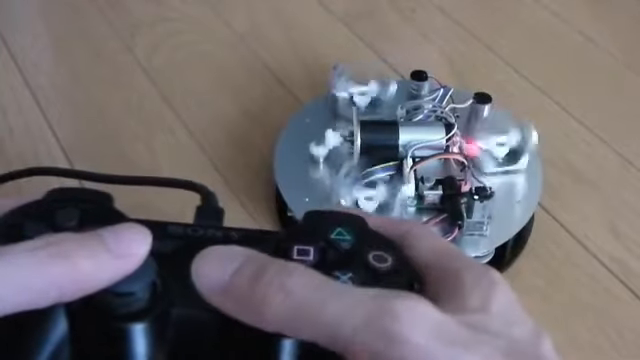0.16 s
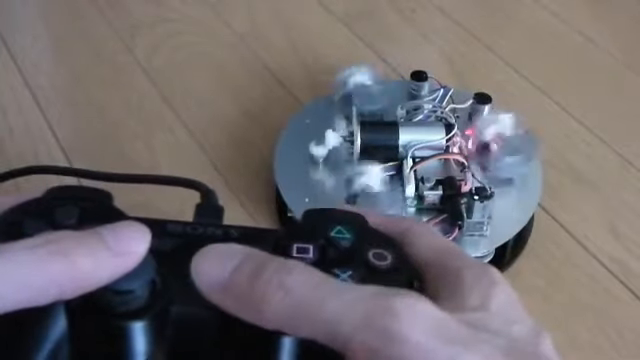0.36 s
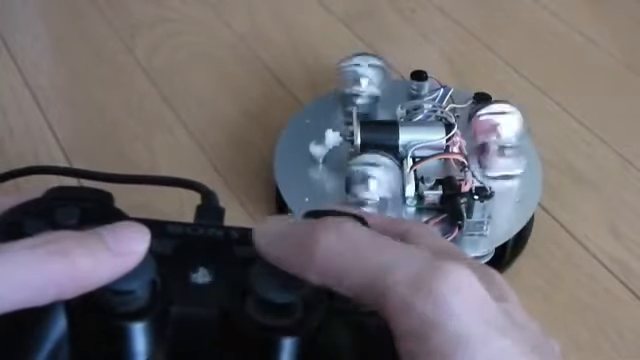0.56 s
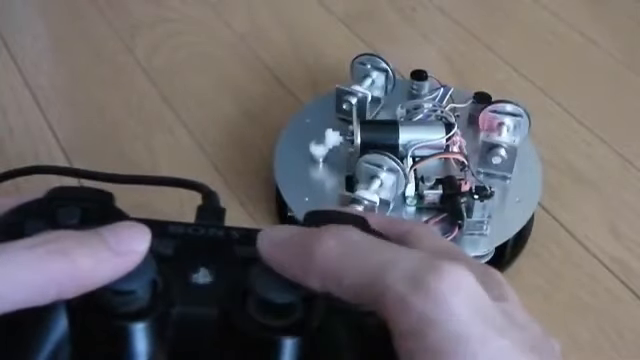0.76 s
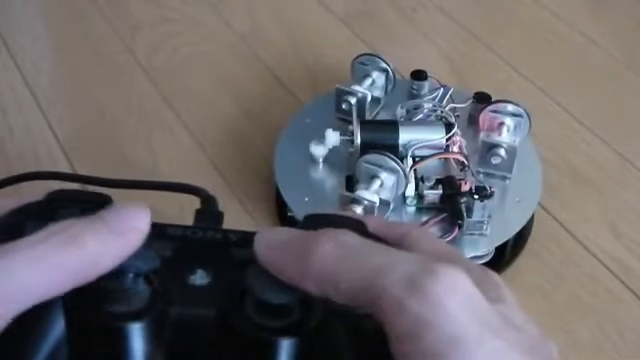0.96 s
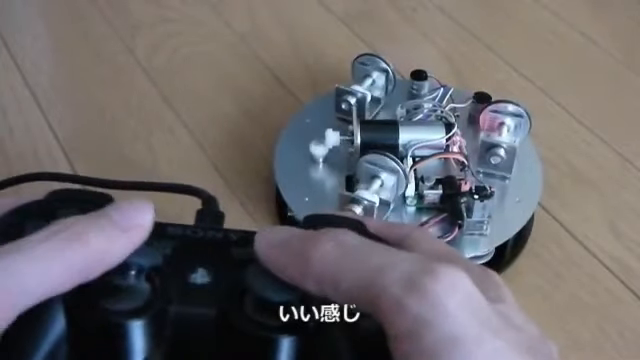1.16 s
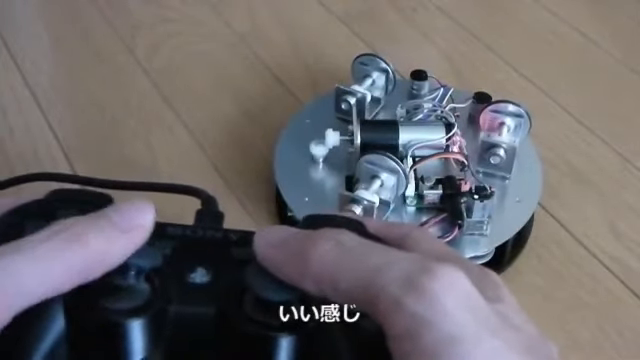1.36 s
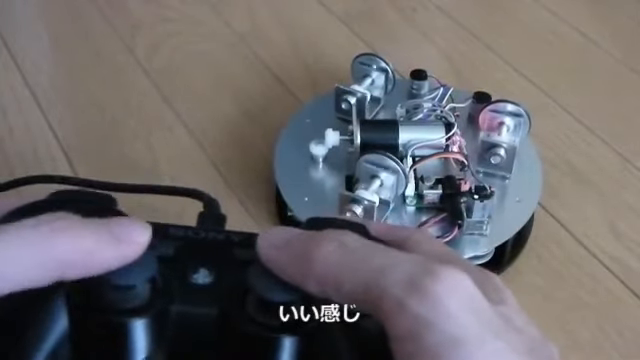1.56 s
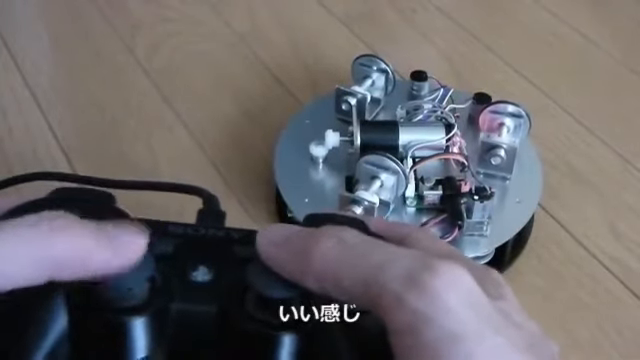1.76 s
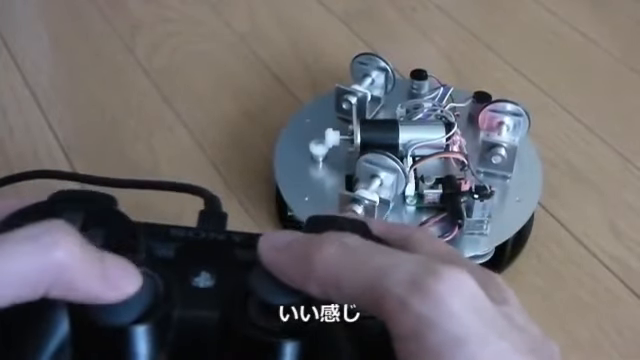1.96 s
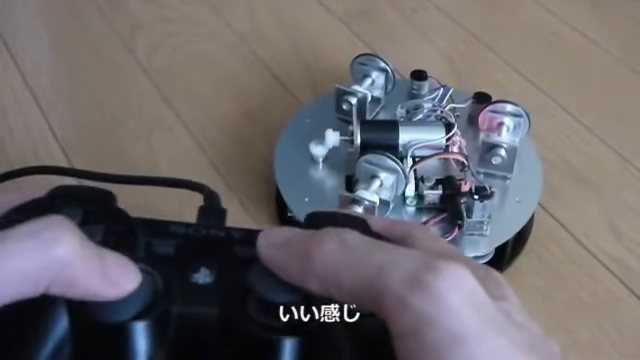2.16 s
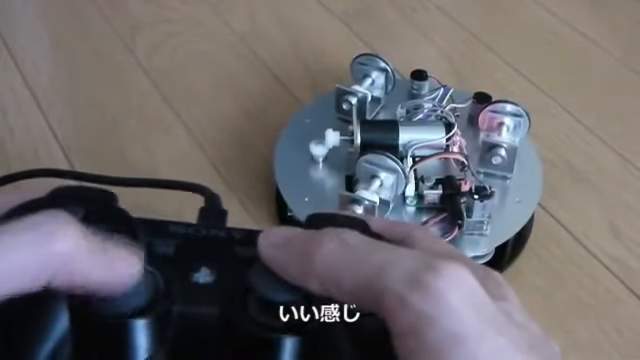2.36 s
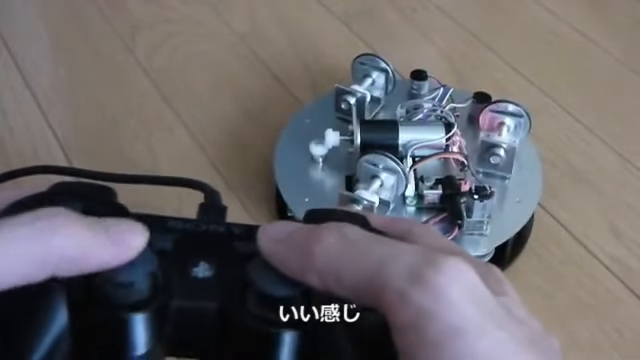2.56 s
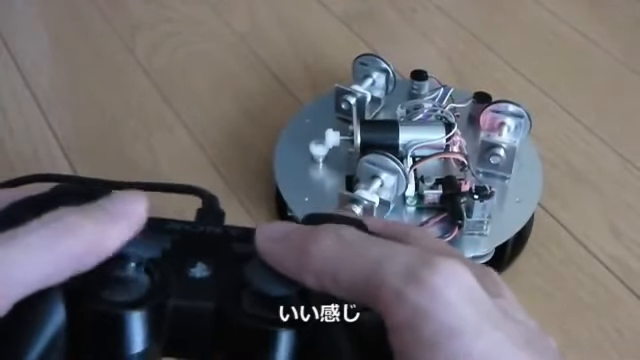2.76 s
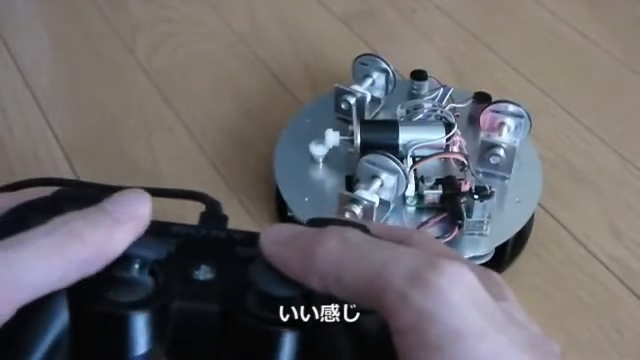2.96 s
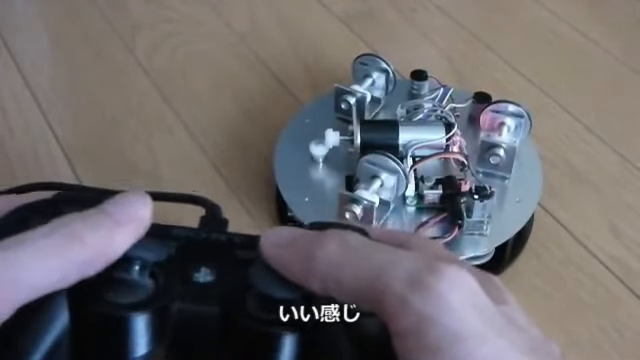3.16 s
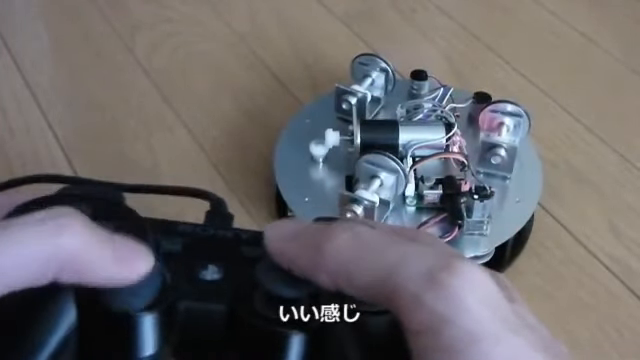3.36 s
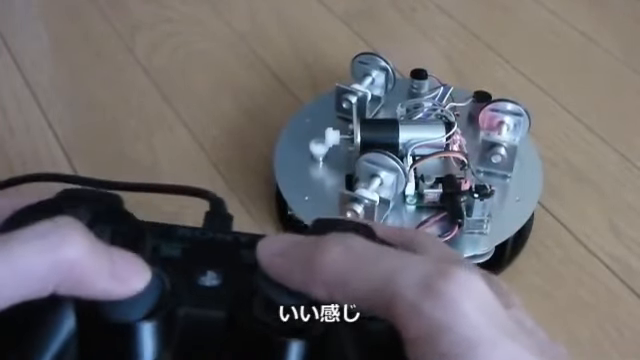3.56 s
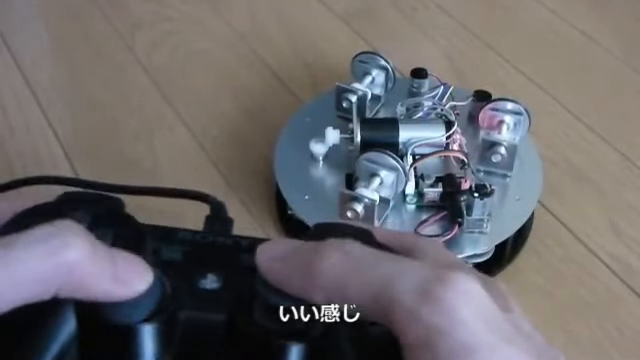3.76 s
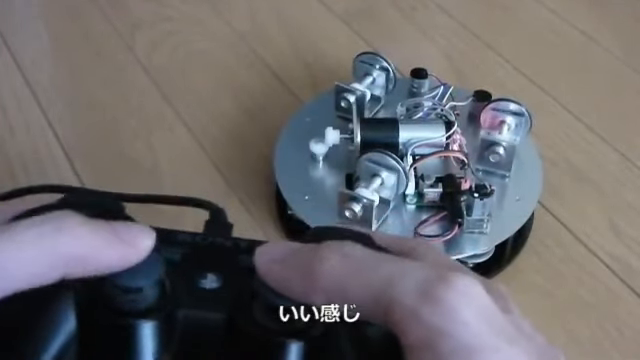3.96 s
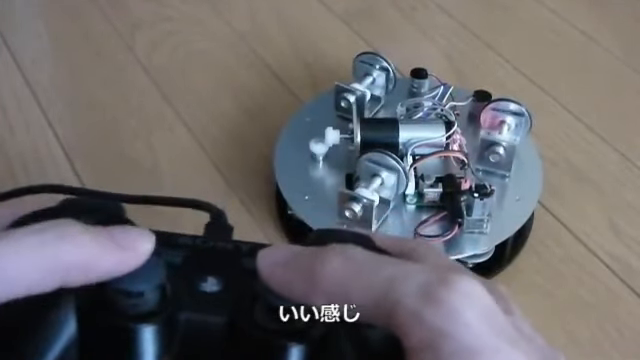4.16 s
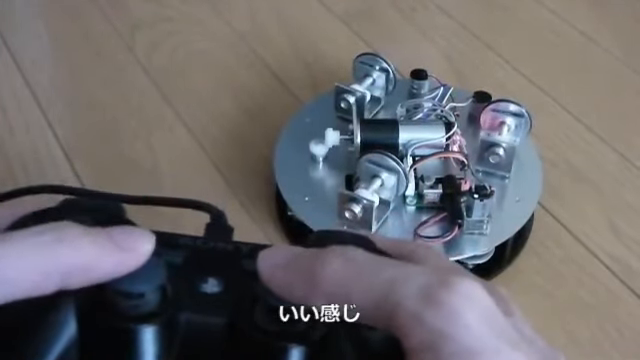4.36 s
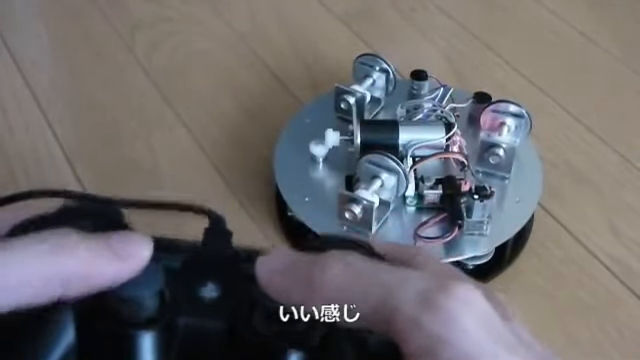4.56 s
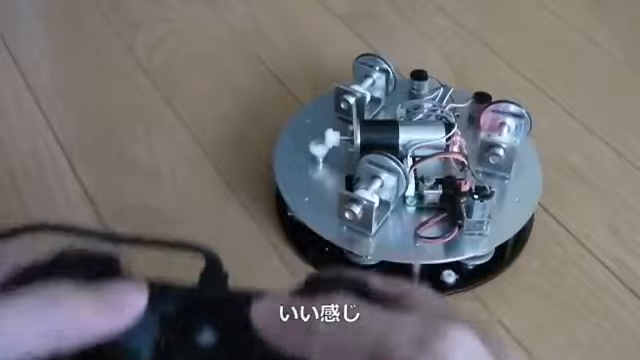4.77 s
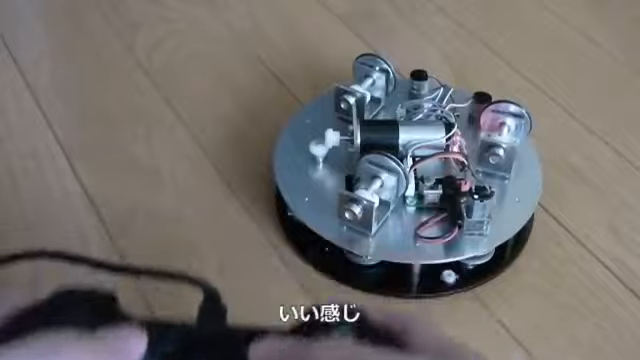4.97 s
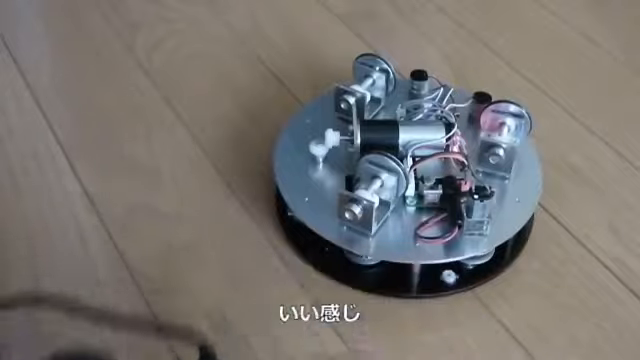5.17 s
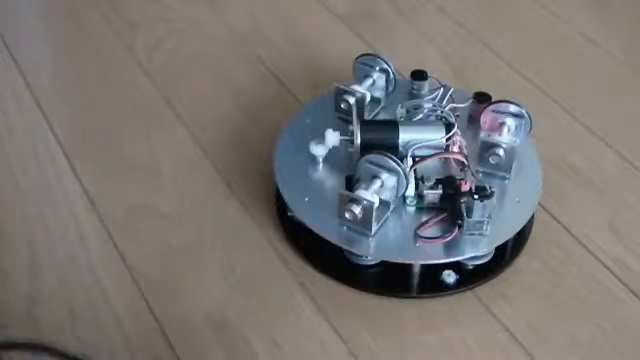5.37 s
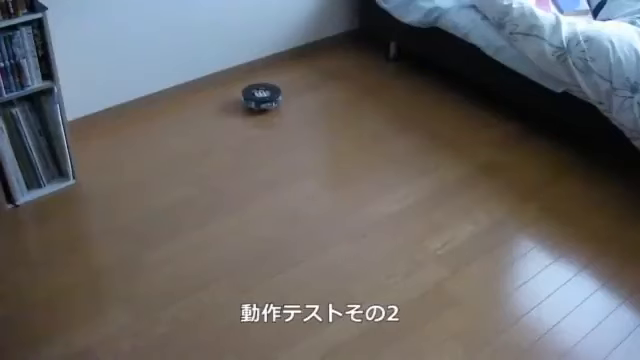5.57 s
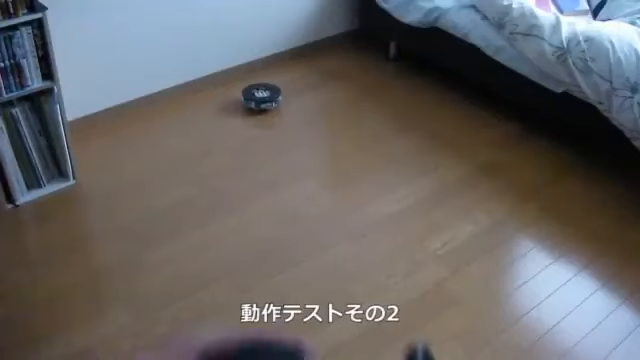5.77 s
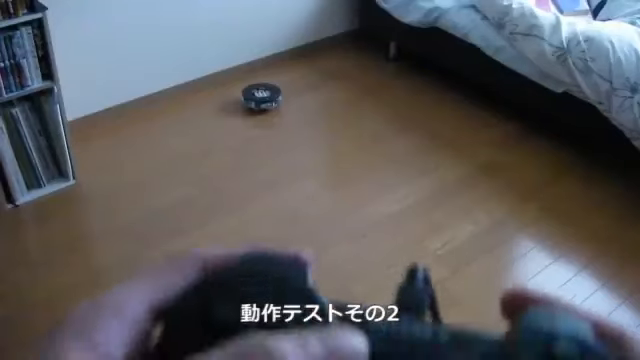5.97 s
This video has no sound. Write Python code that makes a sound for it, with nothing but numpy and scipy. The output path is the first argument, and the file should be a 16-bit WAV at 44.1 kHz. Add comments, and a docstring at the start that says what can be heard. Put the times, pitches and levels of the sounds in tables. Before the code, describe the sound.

A small robot's wheel motors spin with a high, hissing, gently pulsing whine and quickly coast to a stop. A geared steering motor then grinds in four half-second bursts, its teeth rattling, ringing a metal deck and drawing a low drone from the wooden floor. Sharp plastic controller clicks fall around the bursts. It is all close to the microphone in a quiet room, ending on faint hiss and hum.

```python
"""Small robot on a wooden floor

A geared robot base is steered from a hand controller in a quiet room. First its wheel motors whine
freely and coast to a stop. Then a steering motor grinds in four bursts: its gear teeth rattle, ring
the metal deck and shake the floorboards. Levers click in between, over room hum and microphone hiss."""
import sys
import numpy as np
from scipy import signal
from scipy.fft import rfft, irfft, next_fast_len
from scipy.io import wavfile
from scipy.ndimage import uniform_filter1d

SR = 44100
rng = np.random.default_rng(int(sys.argv[2]) if len(sys.argv) > 2 else 0)


def digitize_waveform(pressure):
    """Quantize a signal to 16-bit integers and store it at the path in sys.argv[1].

    Rows of a 2-D input are taken as channels; values are limited to [-1, 1].
    """
    field = np.atleast_2d(pressure).T
    bounded = np.clip(field, -1, 1)
    quanta = np.round(bounded * 32767).astype(np.int16)
    wavfile.write(sys.argv[1], SR, quanta)


N = 268990
T = np.arange(N) / SR
FFT_SIZE = next_fast_len(N + SR // 2)
HZ = np.maximum(np.fft.rfftfreq(FFT_SIZE, 1 / SR), 1)


def from_db(db):
    """Turn decibels into a gain."""
    return 10 ** (np.asarray(db) / 20)


def rms_one(x):
    """Scale a signal to an average power of 1."""
    return x / np.sqrt(np.mean(x ** 2) + 1e-20)


def ramp(start, length):
    """Rise from 0 at start to 1 at start + length."""
    return np.clip((T - start) / length, 0, 1)


def in_time(points):
    """Join (time, value) points into a curve."""
    return np.interp(T, *np.transpose(points))


def at_hz(points):
    """Join (frequency, value) points into a curve."""
    hz, values = np.transpose(points)
    return np.interp(np.log(HZ), np.log(hz), values)


def colour(x, shape, peaks, shape_db):
    """Filter a sound as a ringing body does: peaks standing on a broad shape."""
    power = from_db(2 * (at_hz(shape) + shape_db))
    for hz, width_hz, db in peaks:
        power = power + from_db(2 * db) / (1 + (2 * (HZ - hz) / width_hz) ** 2) ** 2
    cepstrum = irfft(np.log(power / power.mean()) / 2, FFT_SIZE)
    cepstrum[1:FFT_SIZE // 2] *= 2  # folded so that ringing follows a hit, never leads it
    cepstrum[FFT_SIZE // 2 + 1:] = 0
    return irfft(rfft(x, FFT_SIZE) * np.exp(rfft(cepstrum)), FFT_SIZE)[..., :N]


def grit(per_s, spread_db, smooth):
    """Two tracks of uneven ticks mixed with smooth rubbing noise."""
    sizes = from_db(spread_db * np.minimum(rng.exponential(1, (2, N)), 5)) * rng.choice([-1, 1], (2, N))
    ticks = rms_one(sizes * (rng.random((2, N)) < per_s / SR))
    return rms_one(ticks + smooth * rng.standard_normal((2, N)))


def blur(width_hz, size=N):
    """Slow random wobble that smears a tone over nearby pitches."""
    pole = np.exp(-2 * np.pi * width_hz / SR)
    noise = rng.standard_normal(size + SR // 2) + 1j * rng.standard_normal(size + SR // 2)
    wobble = signal.lfilter([1], [1, -2 * pole, pole * pole], noise)[SR // 2:]
    return wobble / np.sqrt(np.mean(np.abs(wobble) ** 2))


def wavering_tone(hz, steady, wobble, blur_hz):
    """A tone with a steady part and a wobbling part."""
    return np.real((steady + wobble * blur(blur_hz)) * np.exp(2j * np.pi * hz * T))


# Background hiss: (frequency [Hz], level [dB])
HISS_SHAPE = [(18, -36), (30, -17), (103, 0), (145, -2.5), (189, -3), (239, -14), (273, -10.5),
              (319, -14.5), (415, -7), (684, -18), (1720, -15.5), (2060, -15.5), (16000, -25.5)]
# Humming peaks in it: (frequency [Hz], width [Hz], level [dB])
HUM_PEAKS = [(50.6, 34, -3), (190.2, 10.5, 3), (238, 8.6, -0.5), (386, 15, -4.5), (430, 13, -4),
             (873, 18, -5.5)]
# A dull noise late on: (time [s], level [dB])
DULL_NOISE = [(4.1, -58.5), (4.95, -56.5), (5.05, -73), (5.55, -61), (5.8, -74), (6.1, -75)]
# Passing hums: (start [s], end [s], pitch [Hz], level [dB], steady part [ratio], blur [Hz])
PASSING_HUMS = [(4.12, 4.66, 395, -57, 0.5, 15.), (4.82, 4.96, 395, -62, .5, 15.),
                (4.3, 4.97, 54, -58, 1.9, 5.), (5.55, 5.68, 54, -57, 1.9, 5.),
                (5.68, 6.2, 122, -50, 3., 8.)]


def room_tone():
    """Hiss, room hum and mains hum; later a dull noise and wavering hums come and go."""
    out = from_db(-53) * colour(rng.standard_normal((2, N)), HISS_SHAPE, HUM_PEAKS, shape_db=3)
    band = signal.butter(2, [200, 950], "band", fs=SR, output="sos")
    dull = rms_one(signal.sosfilt(band, rng.standard_normal((2, N))))
    out += ramp(DULL_NOISE[0][0], 0.061) * from_db(in_time(DULL_NOISE)) * dull
    for start, end, hz, db, steady, blur_hz in PASSING_HUMS:
        fade = ramp(start, 0.052) - ramp(end, 0.052)
        out += fade * from_db(db) / np.hypot(steady, 1) * wavering_tone(hz, steady, 1, blur_hz)
    mains = wavering_tone(100.5, steady=1.2, wobble=.5, blur_hz=4.5)
    return out + from_db(-58.5) * mains


def rustle():
    """One faint, scratchy rustle near the end."""
    peaks = [(4600, 400, 1), (6040, 2500, 0), (8100, 500, -4), (10700, 700, -5)]
    scuff = colour(grit(per_s=2700, spread_db=3, smooth=.8), BODY_SHAPE, peaks, shape_db=-20)
    fade = np.sqrt(ramp(5.57, .06)) * (1 - ramp(5.63, .1))
    return fade * from_db(-53.5) * rms_one(scuff)


# Clicks: (time [s], peak [dB], band centre [Hz], band spread [ratio], time to fade 60 dB [s])
CLICKS = [(.612, -33.5, 755, 2.1, 0.077), (0.61, -22, 7500, 1.2, .02), (1.019, -16, 3430, 1.8, 0.04),
          (1.499, -12, 4080, 1.04, 0.0097), (1.499, -9, 5800, 1.25, 0.011), (1.639, -24, 6800, 1.14, 0.012),
          (1.919, -13.5, 1810, 1.28, 0.013), (1.919, -14, 6450, 1.29, 0.01), (1.956, -20, 2320, 3.4, 0.023),
          (2.749, -33.5, 1860, 1.7, 0.091), (2.773, -21, 1520, 1.52, 0.025), (2.773, -31, 4800, 1.5, 0.019),
          (2.819, -20.5, 3500, 1.9, 0.022), (3.388, -10.5, 1570, 1.16, 0.025),
          (3.447, -9, 4420, 1.25, 0.017), (5.537, -44, 10000, 1.2, .012), (5.572, -43, 900, 1.7, .06),
          (5.755, -48, 9500, 1.1, .012)]


def clicks():
    """Plastic levers and gears click: a snap, then a quickly dying burst of noise."""
    out = np.zeros((2, N))
    t = np.arange(SR // 10) / SR
    for start, db, hz, spread, fade_s in CLICKS:
        spread = max(spread, 1.05)
        band = signal.butter(2, [hz / spread, min(hz * spread, 12500)], "band", fs=SR, output="sos")
        snap = rng.standard_normal((2, len(t))) + 1.2 * (t == 0)
        burst = signal.sosfilt(band, snap * from_db(-60 * t / fade_s))
        at = round(start * SR)
        out[:, at:at + len(t)] += from_db(db) * burst / np.abs(burst[0]).max()
    return out


# Motor kicks: (time [s], level [dB], pitch [Hz])
THUMPS = [(1.963, -20, 152.5), (3.393, -24, 157)]


def thumps():
    """The motor kicks into the floor, which gives a short, low ring."""
    out = np.zeros(N)
    t = np.arange(SR // 10) / SR
    for start, db, hz in THUMPS:
        fade = np.minimum(t / 0.0042, 1) * from_db(db - 60 * t / 0.066)
        at = round(start * SR)
        out[at:at + len(t)] += fade * np.sin(2 * np.pi * hz * t)
    return out


# Wheel gear noise: (frequency [Hz], level [dB])
WHEEL_SHAPE = [(100, -24), (160, -13), (290, -42), (700, -31), (1050, -25.5), (1400, -13.5), (3300, -13.5),
               (5400, -11), (7100, -3.5), (8500, -12), (11300, -6), (12600, -17), (13000, -32),
               (15500, -45)]
# Where the wheel drive rings: (frequency [Hz], width [Hz], level [dB])
WHEEL_PEAKS = [(1570, 140, -18), (2340, 130, -26), (3990, 310, -8), (4940, 550, -11), (6550, 710, -3),
               (7060, 410, 1.5), (8740, 300, -10), (11200, 400, -10.5)]
# Rings that lift the whine's octave as it passes: (frequency [Hz], width [Hz], level [dB])
OCTAVE_PEAKS = [(7400, 200., -4), (8500, 350., 0.8)]
# Shaft tones: (multiple of shaft speed [ratio], level [dB], blur [Hz])
SHAFT_TONES = [(1.01, -58, 13.6), (6, -54.5, 8), (12.2, -46.5, 11), (14.03, -47, 6.8), (17.9, -54, 10),
               (19.65, -45.5, 13), (38.6, -42, 140), (94, -40, 110)]
TEETH_PER_TURN, WHEEL_TURN_S = 32.5, .302
COAST_S, POWER_OFF_S, STILL_S = .61, .65, .73


def wheels():
    """Spinning gears hiss and whine; once per wheel turn the load eases and the shaft speeds up."""
    coasted_s = np.maximum(T - COAST_S, 0)
    ease = (.5 + .5 * np.cos(2 * np.pi * (T - .062) / WHEEL_TURN_S)) ** 2
    turns_per_s = 113.5 + (20.5 - 6 * T) * ease - 120 * coasted_s
    angle = 2 * np.pi * np.cumsum(turns_per_s) / SR
    level = from_db(1.7 * np.cos(angle) - 191 * coasted_s)  # swells each shaft turn, fades on coasting
    teeth = (T < STILL_S) * level * grit(per_s=6000, spread_db=3.8, smooth=1.1)
    gear_noise = from_db(-25.5) * colour(teeth, WHEEL_SHAPE, WHEEL_PEAKS, shape_db=-4)

    def shaft_tone(multiple, blur_hz, steady):
        """Two tracks of a blurred tone that follows the shaft, one second long."""
        tone = np.exp(1j * multiple * angle[:SR]) / np.hypot(steady, 1)
        pair = [np.real((steady + blur(blur_hz, size=SR)) * tone) for _ in range(2)]
        return np.pad(pair, [(0, 0), (0, N - SR)])

    whine = from_db(-42.5 + 10.5 * ease) * shaft_tone(TEETH_PER_TURN, blur_hz=65, steady=1.4)
    octave_hz = 2 * TEETH_PER_TURN * turns_per_s
    ring = sum(from_db(db) / np.hypot(1, 2 * (octave_hz - hz) / width) for hz, width, db in OCTAVE_PEAKS)
    octave = ring * from_db(-27) * shaft_tone(2 * TEETH_PER_TURN, blur_hz=200, steady=0.15)
    tones = sum(from_db(db) * shaft_tone(multiple, blur_hz, steady=1.6)
                for multiple, db, blur_hz in SHAFT_TONES)
    powered = np.clip((POWER_OFF_S - T) / 0.017, 0, 1)  # the tones stop with the current
    return gear_noise + powered * level * (whine + octave + tones)


# Three stretches of floor drone, each a list of (time [s], level [dB])
DRONE_LEVELS = [
    [(1.0, -85), (1.02, -54), (1.048, -43), (1.396, -50), (1.422, -48), (1.472, -39), (1.608, -38.5),
     (1.8, -68)],
    [(1.94, -58), (1.972, -34), (2.002, -42), (2.226, -33), (2.276, -47), (2.304, -34.5), (2.572, -32),
     (2.74, -67)],
    [(2.8, -57), (2.85, -38), (3.252, -46.5), (3.512, -41.5), (3.556, -53), (3.626, -27), (4.004, -35),
     (4.2, -62)],
]


def floor_drone():
    """The floorboards drone on one low note along with the steering motor."""
    on = sum((T >= stretch[0][0]) & (T <= stretch[-1][0]) for stretch in DRONE_LEVELS)
    level = from_db(in_time([point for stretch in DRONE_LEVELS for point in stretch]))
    return on * level * wavering_tone(150, steady=.85, wobble=.55, blur_hz=12)


# Rising whines: (start [s], length [s], first pitch [Hz], last pitch [Hz], level [dB])
SPIN_UPS = [(1.097, .06, 2300, 2650, -26), (1.975, .06, 2250, 2550, -30), (2.836, .06, 2200, 2750, -25),
            (3.462, .09, 2350, 2500, -30)]
MOTOR_START_S = 0.0043


def spin_ups():
    """A rough whine climbs and fades as the steering motor gets up to speed."""
    out, wobble = np.zeros(N), blur(width_hz=70)
    for start, length, from_hz, to_hz, db in SPIN_UPS:
        progress = ramp(start, length)
        phase = 2 * np.pi * np.cumsum(from_hz + (to_hz - from_hz) * progress) / SR
        fade = ramp(start, MOTOR_START_S) * np.sqrt(1 - progress)
        out += fade * from_db(db) * np.real((1.1 + wobble) * np.exp(1j * phase))
    return out


# Steering bursts: (start [s], gears grip [s], release [s], level [dB], early slack [dB],
# late slack [dB], braking [dB], high ring [dB], extra ring until just after the grip [dB])
BURSTS = [(1.017, 1.087, 1.576, -24.5, -6.5, -6, -1, 1.3, 3.),
          (1.952, 1.989, 2.538, -24, -3.5, -1, 0, -1.5, 5),
          (2.813, 2.829, 3.396, -24.5, -12, -4, -4, 1.9, 2),
          (3.452, 3.532, 3.998, -24, -5.5, -2, -9.5, -2, 6)]
# Steering one way, a tight spot binds once per turn: (time [s], swell [dB])
TIGHT_SPOTS = [(2.015, 10.5), (2.063, 5.5), (2.11, 6), (2.158, 5.5), (2.206, 4.5), (2.254, 6.5), (2.3, 7),
               (2.349, 5.5), (2.397, 4.5), (2.445, 11), (2.488, 8.5), (2.541, 9.5), (3.562, 6), (3.607, 7),
               (3.656, 10.5), (3.70, 9.5), (3.746, 1), (3.794, 10), (3.841, 6.5), (3.891, 9.5), (3.935, 6),
               (3.976, 5.5)]


def shaking(gain_db, slack, binding, fade_db_per_s, rings_high=False):
    """How hard the gears shake one part: each burst takes up slack, grips, brakes and runs down."""
    swell_db = sum(db * np.exp(-.5 * ((T - time) / .006) ** 2) for time, db in TIGHT_SPOTS)
    swell_db -= uniform_filter1d(swell_db, SR // 10)  # looser between the tight spots
    out = np.zeros(N)
    for start, grip, release, level_db, early_db, late_db, brake_db, ring_db, bite_db in BURSTS:
        slack_db = (early_db + (late_db - early_db) * ramp(start, grip - start)) * (1 - ramp(grip, .041))
        stop_db = brake_db * ramp(release, .007) - fade_db_per_s * np.maximum(T - release, 0)
        high_db = rings_high * (ring_db + bite_db * np.exp(-np.maximum(T - grip, 0) / .03))
        out += ramp(start, MOTOR_START_S) * from_db(level_db + slack * slack_db + stop_db + high_db)
    return out * from_db(gain_db + binding * swell_db)


# Steering the other way, the gears chatter: (start [s], end [s], rate [Hz], depth [dB])
CHATTER = [(1.102, 1.573, 82, 1.5), (2.837, 3.395, 59, 1.5)]
# Gearbox noise: (frequency [Hz], level [dB])
GEARBOX_SHAPE = [(60, -2.5), (1000, -38), (1500, -24), (1960, -12), (2980, -6), (5000, -7.5), (6870, -6),
                 (8200, -16.5), (10600, -11.5), (11400, -21.5), (12000, -26.5), (15500, -48)]
# Noise between the peaks of the deck, floor and rustle: (frequency [Hz], level [dB])
BODY_SHAPE = [(30, -70), (70, -53), (150, -21), (1500, -6.5), (4000, -29), (16000, -55)]
# Where the gearbox, metal deck and floorboards ring: (frequency [Hz], width [Hz], level [dB])
GEARBOX_PEAKS = [(3320, 320, -6), (4000, 430, -4.5), (4700, 200, -16), (5690, 180, -2), (6930, 380, -2.5),
                 (7330, 200, -6.5), (8350, 230, -10.5), (10600, 850, -15.5)]
DECK_LOW_PEAKS = [(1350, 130, -1), (1450, 29, -1.5), (1513, 96, -1), (1580, 320, 0.5), (1804, 57, -4.5)]
DECK_HIGH_PEAKS = [(2143, 260, 0), (2353, 190, 4.5), (2540, 356, 3), (2720, 137, -2.5)]
FLOOR_PEAKS = [(114.5, 29, 5), (183, 63, 2), (275, 18, -2), (415, 102, 1), (476, 89, -1.5),
               (544, 150, -6.5), (688.7, 70, 1), (900, 250, -9)]


def steering():
    """Gear teeth rattle in the gearbox, ring the metal deck and make the floorboards rumble."""
    chatter_db = sum(db * np.cos(2 * np.pi * rate * (T - start)) * (T > start) * (T < end)
                     for start, end, rate, db in CHATTER)
    teeth = from_db(chatter_db) * grit(per_s=7000, spread_db=4.32, smooth=0.91)
    gearbox = teeth * shaking(0.35, slack=1.46, binding=0.76, fade_db_per_s=266)
    deck_low = teeth * shaking(-1.64, slack=1.6, binding=0.36, fade_db_per_s=248)
    deck_high = teeth * shaking(-2.5, slack=1.57, binding=0.59, fade_db_per_s=307, rings_high=True)
    floor = teeth * shaking(-12, slack=0.96, binding=0.56, fade_db_per_s=137)
    grind = (colour(gearbox, GEARBOX_SHAPE, GEARBOX_PEAKS, shape_db=0.5)
             + colour(deck_low, BODY_SHAPE, DECK_LOW_PEAKS, shape_db=-7.5)
             + colour(deck_high, BODY_SHAPE, DECK_HIGH_PEAKS, shape_db=-28)
             + colour(floor, BODY_SHAPE, FLOOR_PEAKS, shape_db=-4.5))
    bass_cut = signal.butter(4, 95, "high", fs=SR, output="sos")  # so small a body gives no deep bass
    return signal.sosfilt(bass_cut, grind) + floor_drone() + spin_ups() * [[1], [0]]  # middle track only


def room_echo(x, fade_s=0.37, level_db=-13.5):
    """The room adds a short wash of echoes, duller than the direct sound."""
    t = np.arange(SR // 2) / SR
    tail = rng.standard_normal(len(t)) * from_db(-60 * t / fade_s) * (t > .004)
    tail = signal.lfilter([1], [1, -.45], tail)
    return from_db(level_db) * signal.fftconvolve(x, tail[None] / np.sqrt(np.sum(tail ** 2)))[:, :N]


# How much the treble leans to the right: (frequency [Hz], level [dB])
LEAN_LEVEL = [(4500, -108), (6000, -22), (7000, -15), (8500, -23), (10500, -9), (14000, -18)]
# How far that leaning part shifts along its wave: (frequency [Hz], phase [rad])
LEAN_PHASE = [(5000, .1), (7000, 0.34), (9000, 1.2), (11500, 1.5)]


def stereo(pair, width):
    """A middle and a side track become left and right; treble reaches the two microphones unevenly."""
    lean = from_db(at_hz(LEAN_LEVEL)) * np.exp(1j * at_hz(LEAN_PHASE))
    side = rfft(pair[1], FFT_SIZE) * from_db(at_hz(width)) - rfft(pair[0], FFT_SIZE) * lean
    return pair[0] + np.array([[1], [-1]]) * irfft(side, FFT_SIZE)[:N]


# Side track gain of the room and the robot: (frequency [Hz], side track gain [dB])
ROOM_WIDTH = [(60, -21), (130, -25), (290, -16), (640, -12), (1410, -20.5), (3100, -16.5), (6820, 1.5),
              (15000, -3)]
ROBOT_WIDTH = [(200, -38), (400, -27.5), (800, -38), (1500, -90), (2500, -76), (4500, -75), (5400, -16),
               (6200, -16), (7200, -10), (9000, -7), (11000, -14), (14000, -5)]


def scene():
    """Robot and controller close in front, the room all around."""
    near = wheels() + steering() + clicks() + thumps() + rustle()
    return stereo(near + room_echo(near), ROBOT_WIDTH) + stereo(room_tone(), ROOM_WIDTH)


def record(dry):
    """Cut a narrow slice of treble, the deepest rumble and the very top."""
    notch_hz, width_hz = 7800, 270
    out = signal.lfilter(*signal.iirnotch(notch_hz, notch_hz / width_hz, SR), dry)
    out = signal.sosfilt(signal.butter(3, 42, "high", fs=SR, output="sos"), out)
    return signal.sosfilt(signal.cheby2(24, 60, 15900, fs=SR, output="sos"), out)


dry = scene()
out = record(dry)
digitize_waveform(out)
```